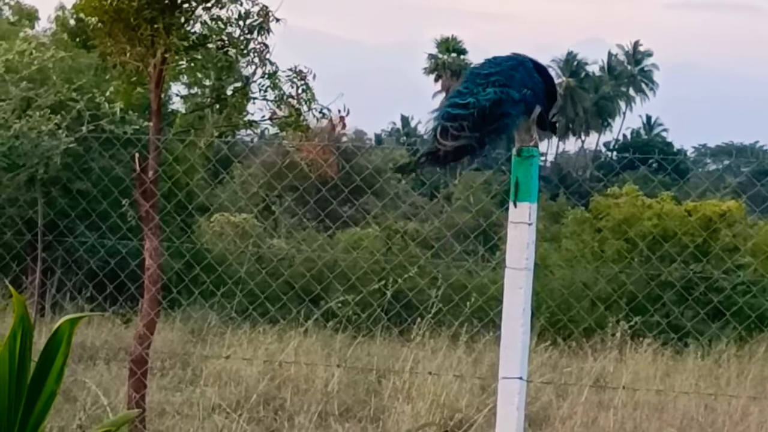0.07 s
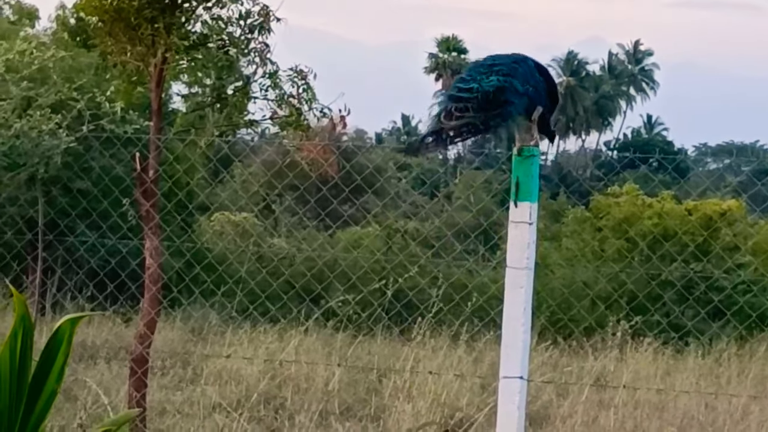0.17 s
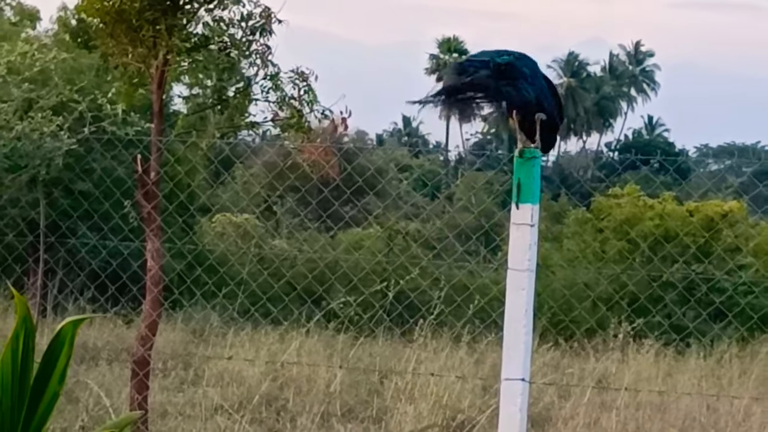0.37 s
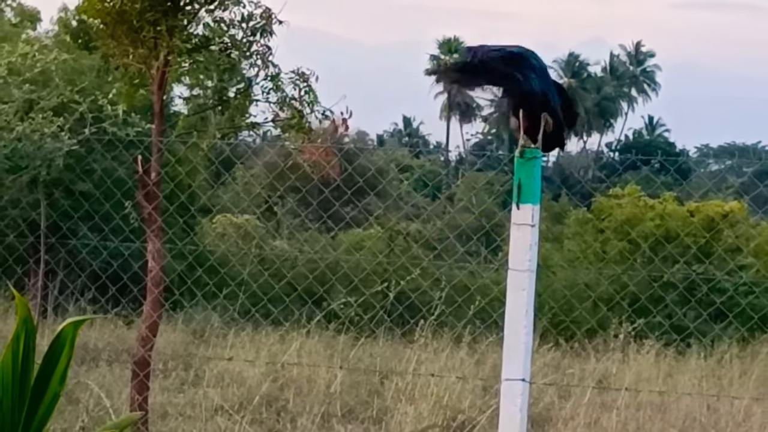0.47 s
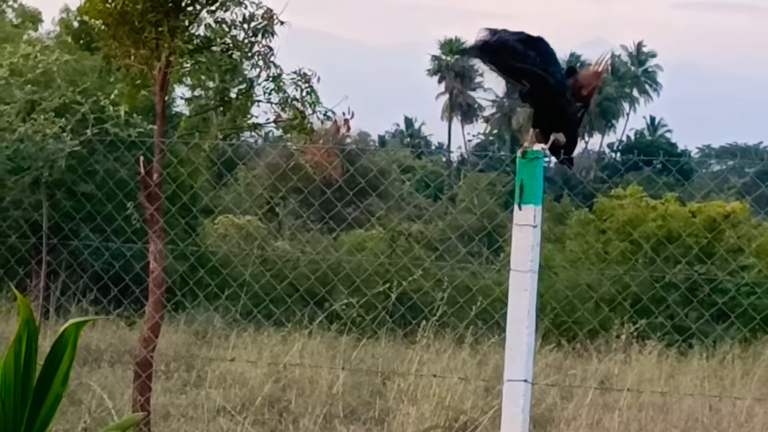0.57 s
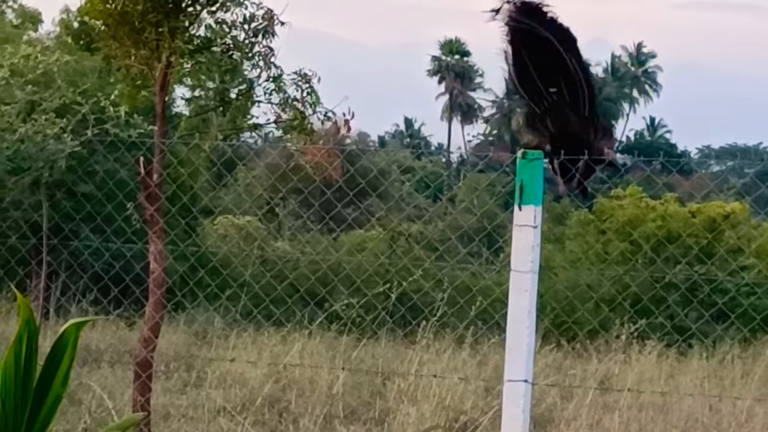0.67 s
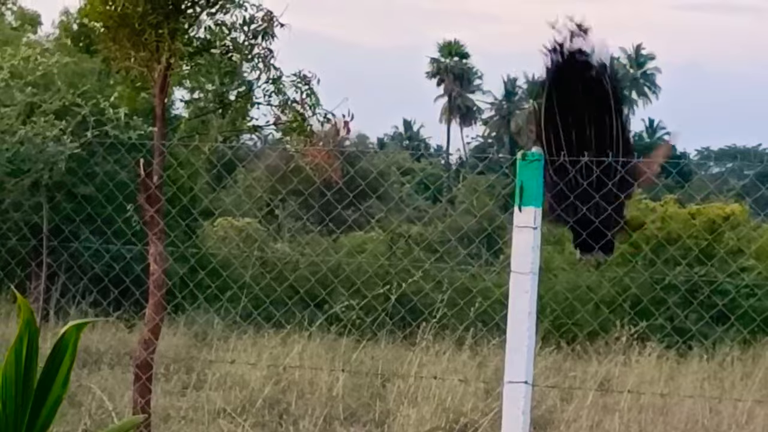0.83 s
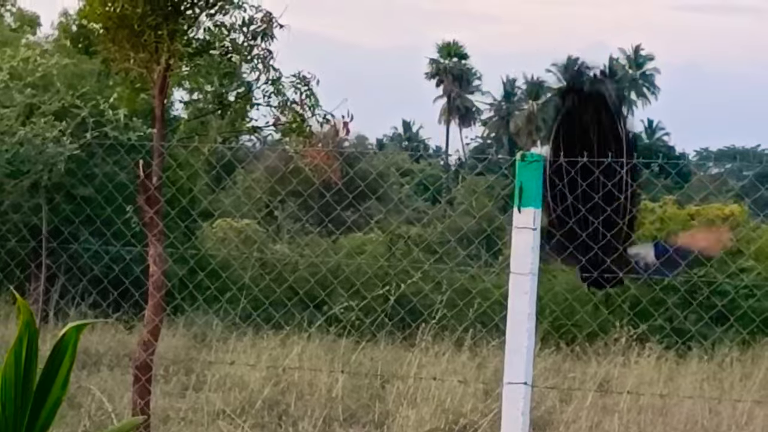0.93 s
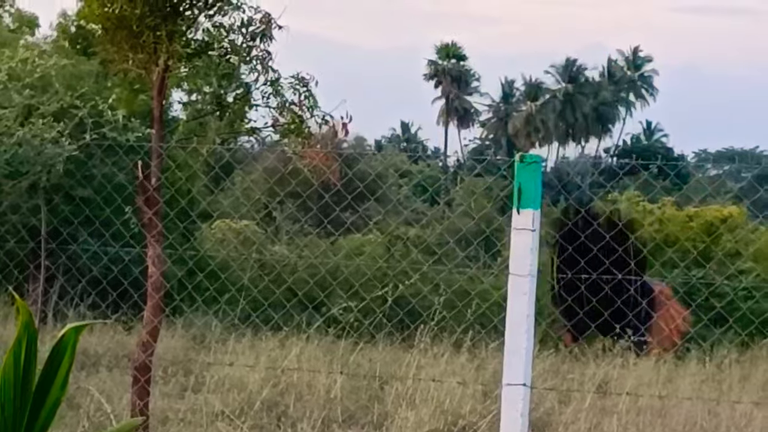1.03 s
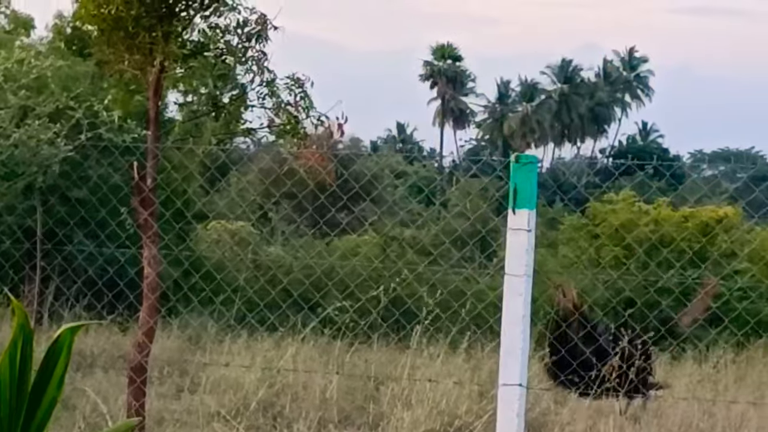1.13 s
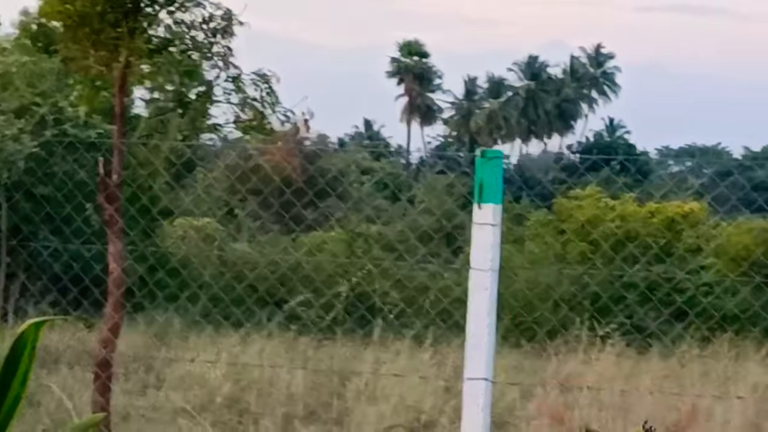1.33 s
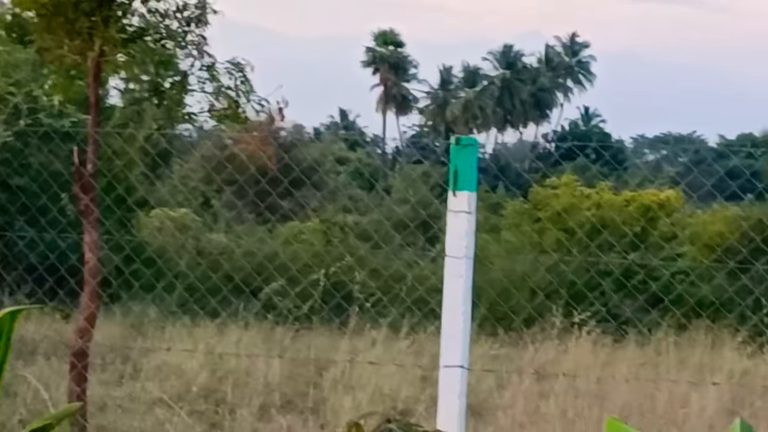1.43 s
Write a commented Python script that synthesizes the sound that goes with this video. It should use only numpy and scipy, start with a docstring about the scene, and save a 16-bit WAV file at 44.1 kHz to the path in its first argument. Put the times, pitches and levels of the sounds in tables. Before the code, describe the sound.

Insects trill in quick, high runs over a far cricket chorus at a field edge. Wind buffets the microphone's left side with a low rumble, then a peacock drops off a post, rustling softly. Small birds call faintly.

```python
"""A field edge at dusk: a far cricket chorus hisses while nearer insects rub their wings in slowing runs
of falling chirps. A gust buffets the left microphone port with a low rumble, the loudest sound here.
Something rustles softly (crackly noise and tiny snaps) as a peacock drops off a fence post.
Small birds call in the distance with short tones, and a thin insect ticks over the hush of open air."""
import sys
import numpy as np
from scipy import signal
from scipy.fft import rfft, irfft
from scipy.io import wavfile
from scipy.ndimage import uniform_filter1d

SR = 44100
rng = np.random.default_rng(int(sys.argv[2]) if len(sys.argv) > 2 else 0)


def generate_wav(sig):
    """Save sig (samples, or channels by samples) to the path in sys.argv[1] as 16-bit PCM at SR."""
    pcm = np.round(np.clip(np.atleast_2d(sig).T, -1, 1) * 32767).astype(np.int16)
    wavfile.write(sys.argv[1], SR, pcm)


N = 66150
TIME = np.arange(N) / SR
RUSTLE_PAN_DB = 12.5


def from_db(db):
    """Turn decibels into a gain to multiply by."""
    return 10 ** (np.asarray(db) / 20)


def rms_one(x):
    """Scale a signal so that its average power is 1."""
    return x / np.sqrt(np.mean(x ** 2) + 1e-20)


def pan(db):
    """Left and right gains: positive db is louder on the left, negative on the right."""
    return rms_one(np.array([[from_db(db)], [1.]]))


def in_time(rows):
    """Join (time, value) points with straight lines."""
    return np.interp(TIME, *np.transpose(rows))


def per_bin(points):
    """Join (pitch, value) points into a curve over all frequencies, with octaves evenly spaced."""
    hz, value = np.transpose(points)
    return np.interp(np.log(np.fft.rfftfreq(N, 1 / SR) + 1), np.log(hz), value)


def tint(x, colour):
    """Give a signal a tone colour, listed as (pitch_hz, level_db) points, and a power of 1."""
    return rms_one(irfft(rfft(x) * from_db(per_bin(colour)), N))


def noise(colour):
    """Steady noise with the given tone colour."""
    return tint(rng.standard_normal(N), colour)


def drift(rate_hz):
    """Smooth random wandering of about 1 either way, mostly slower than rate_hz."""
    smoothing = 1 + (np.fft.rfftfreq(N, 1 / SR) / rate_hz) ** 2
    return rms_one(irfft(rfft(rng.standard_normal(N)) / smoothing, N))


def even(x):
    """Level out the slow swells in a noise."""
    return x / np.sqrt(uniform_filter1d(x ** 2, size=1300) + 1e-9)


def chirp(middle_s, length_s, hz, glide_hz_per_s, waver_hz=0, octave_gain=0):
    """A gliding tone that swells and fades around middle_s."""
    out = np.zeros(N)
    live = np.abs(TIME - middle_s) < length_s / 2
    t = TIME[live] - middle_s
    pitch_hz = hz + glide_hz_per_s * t + (waver_hz[live] if np.ndim(waver_hz) else 0)
    phase = 2 * np.pi * (np.cumsum(pitch_hz) / SR + rng.random())
    swell = np.cos(np.pi * t / length_s) ** 2
    out[live] = swell * (np.sin(phase) + octave_gain * np.sin(2 * phase))
    return out


def air():
    """The steady hush of open country."""
    # tone colour of the hush: pitch_hz, level_db
    colour = [(20, -17), (70, 7.5), (130, 0.5), (220, -6.5), (400, -15), (650, -7.5), (1080, -6),
              (1450, -17), (2050, -15), (2600, -31), (4400, -35.5), (8500, -46), (9800, -64), (13500, -38),
              (15500, -43)]
    # how alike left and right are: pitch_hz, likeness (1 the same, -1 opposite)
    likeness = [(60, 0.81), (290, 0.12), (640, 0.048), (1100, -0.82), (1500, -0.65), (3100, 0.013),
                (15000, 0)]
    alike = np.clip(per_bin(likeness), -.98, .98)
    same = irfft(rfft(noise(colour)) * np.sqrt((1 + alike) / 2), N)
    opposite = irfft(rfft(noise(colour)) * np.sqrt((1 - alike) / 2), N)
    return from_db(-55) * np.array([same + opposite, same - opposite])


def cricket_chorus():
    """Countless far crickets merge into a hiss, with a few pulsing through it."""
    # tone colour of the hiss: pitch_hz, level_db
    colour = [(4000, -26), (4650, -25.5), (5250, -9), (5700, -15.5), (6250, -7), (6650, -7), (7200, 1.5),
              (7600, 1.5), (8000, -4), (8550, -11), (8950, -24), (9400, -47.5)]
    # crickets that stand out: pitch_hz, chirps_per_s, level_db, pan_db
    crickets = [(7600, 14, -62, 14), (7300, 24, -71.5, -1), (7950, 29, -62.5, 23), (5650, 210, -82.5, -7)]
    hiss = [noise(colour) * from_db(-59.5 + .5 * drift(rate_hz=45)) for _ in range(2)]
    out = pan(db=1) * np.array(hiss)
    for hz, rate, db, pan_db in crickets:
        for beat_s in (np.arange(int(rate * N / SR) + 1) + rng.random()) / rate:
            level = from_db(db + rng.normal(0, 1.1))
            s = beat_s + rng.normal(0, .0015)
            note = chirp(s, length_s=.03, hz=hz + rng.normal(0, 28), glide_hz_per_s=-28000)
            out += pan(pan_db) * level * note
    return out


def birds():
    """Faint gliding notes and duller calls from farther off; a fast pitch wobble makes them raspy."""
    # gliding notes: middle_s, length_s, pitch_hz, glide_hz_per_s, level_db, pan_db, rasp_hz
    notes = [(0.169, 0.071, 2396, -4000, -64.5, 20, 256), (0.388, 0.06, 3580, -500, -74, -13, 35),
             (0.892, .07, 3880, -4000, -70.5, -12, 130), (1.476, 0.045, 2335, 22000, -61, -14, 40.3),
             (1.477, 0.073, 3990, 14000, -64.5, 7, 430), (1.497, .026, 3350, -5000, -65, -22, 50)]
    # dull calls: middle_s, length_s, pitch_hz, level_db, pan_db
    far_calls = [(.522, 0.025, 1106, -59.5, -5), (0.643, 0.031, 1104, -57.5, -1),
                 (1.3, .07, 1080, -59.5, -6), (1.369, .04, 1002, -61.5, -12), (1.409, 0.032, 737, -54, -5)]
    out = np.zeros((2, N))
    for s, length, hz, glide, db, pan_db, rasp_hz in notes:
        out += pan(pan_db) * from_db(db) * chirp(s, length, hz, glide, rasp_hz * drift(rate_hz=530))
    for s, length, hz, db, pan_db in far_calls:
        out += pan(pan_db) * from_db(db) * chirp(s, length, hz, 0, waver_hz=45 * drift(rate_hz=250))
    return out


def insect_ticks():
    """Short falling notes of a high-pitched insect on the right."""
    # thin ticks: middle_s, level_db
    ticks = [(.03, -70), (.196, -71), (.245, -68), (.297, -68), (.455, -69), (.503, -70), (.558, -70.5),
             (.725, -75), (.774, -73.5), (.826, -72), (0.849, -71), (.97, -73), (1.035, -69), (1.087, -70),
             (1.24, -71), (1.292, -69), (1.343, -67), (1.392, -69.5), (1.493, -73)]
    waver_hz = 60 * drift(rate_hz=170)
    out = np.zeros(N)
    for s, db in ticks:
        out += from_db(db) * chirp(s, length_s=.028, hz=8950, glide_hz_per_s=-14000, waver_hz=waver_hz)
    return pan(db=-11) * out


def rustle():
    """Soft brushing with a fine crackle in it, mostly on the left."""
    # loudness of the rustle: time_s, level_db
    loudness = [(0, -88.5), (.5, -77.5), (.56, -70), (.59, -69), (.614, -68.5), (.65, -62), (.714, -63.5),
                (.735, -73), (.792, -69.5), (.82, -62), (.866, -74), (.9, -64.5), (.92, -67), (1.02, -70),
                (1.068, -57), (1.09, -72), (1.118, -78), (1.145, -67), (1.204, -74), (1.282, -60),
                (1.312, -72), (1.408, -70), (1.5, -70.5)]
    # its tone colour: pitch_hz, level_db
    colour = [(500, -23.5), (1100, 18.5), (1500, 6.5), (2000, 13.5), (2800, -4.5), (3600, 4.5), (4400, 9),
              (5500, 1.5), (9000, -3), (12000, -3), (15500, -7.5)]
    clicks_per_s = 900
    level = from_db(in_time(loudness) + .5 * drift(rate_hz=900))
    clicks = (rng.random(N) < clicks_per_s / SR) * rng.standard_normal(N)
    crackle = from_db(-3) * tint(clicks, colour)
    brushing = np.array([noise(colour), noise(colour)])
    return pan(RUSTLE_PAN_DB) * level * rms_one(brushing + crackle)


def snaps():
    """Tiny dry cracks in the rustle: bursts of noise that rise fast and die away."""
    # cracks: peak_s, level_db, pitch_hz, width_octaves, decay_s
    cracks = [(.59, -69, 8900, 0.88, 0.0059), (0.897, -62.5, 10000, .5, 0.0034),
              (0.984, -65, 11100, 0.64, .002), (1.072, -52, 4220, 0.11, 0.0059),
              (1.277, -62, 4360, 0.12, 0.0034)]
    rise_s = .0011
    out = np.zeros(N)
    for s, db, hz, octaves, decay_s in cracks:
        colour = [(hz / 16 ** octaves, -48), (hz, 0), (hz * 16 ** octaves, -48)]
        rise = np.clip((TIME - s) / rise_s + 1, 0, 1)
        fall = np.exp(-np.maximum(TIME - s, 0) / decay_s)
        out += from_db(db) * noise(colour) * rise * fall
    return pan(RUSTLE_PAN_DB) * out


def insect_trills():
    """Each run of wing strokes slows toward its end; the ground echoes its chirps, duller."""
    # runs: last_chirp_s, chirp_count, pitch_hz, level_db, fade_in_db_per_chirp, pan_db, echo_db
    runs = [(.101, 6, 5057, -55.5, 0, -17, -1), (.21, 12, 5275, -52, 0.8, 25, -4),
            (0.371, 4, 5450, -69, 0, 10, -13), (.758, 13, 5060, -55, 2.5, -18.5, -9.5),
            (1.392, 12, 5046, -55.5, 2, -16, -11)]
    # single chirps of the same insects: middle_s, length_s, pitch_hz, level_db
    lone_chirps = [(.282, 0.024, 5080, -68), (0.298, 0.024, 4840, -68.5), (0.771, .018, 4600, -67),
                   (1.098, .018, 5200, -61), (1.463, 0.019, 5100, -68)]
    chirp_s, echo_delay_s, glide_hz_per_s = .017, .0076, -37000
    last_gap_s, gap_step_s, shortest_gap_s = .0305, .0023, .017
    waver_hz = 50 * drift(rate_hz=170)
    out = np.zeros((2, N))
    for s, count, hz, db, fade_db, pan_db, echo_db in runs:
        octave_gain = from_db(-22 + min(pan_db, 0))
        for k in range(count):  # work backward from the last chirp
            fade_steps = max(0, k - 7)  # the last eight chirps are at full strength
            level = from_db(db - fade_db * fade_steps + rng.normal(0, 1))
            direct = chirp(s, chirp_s, hz, glide_hz_per_s, waver_hz, octave_gain)
            echo = from_db(echo_db) * chirp(s + echo_delay_s, chirp_s, hz, glide_hz_per_s, waver_hz)
            out += pan(pan_db) * level * (direct + echo)
            s -= max(shortest_gap_s, last_gap_s - gap_step_s * k)
    for s, length, hz, db in lone_chirps:
        out += pan(db=-19) * from_db(db) * chirp(s, length, hz, glide_hz_per_s, waver_hz)
    return out


def wind():
    """A gust hits the left port with a slow push, fast swirls and thumps; the right port is sheltered."""
    # rise and fall of the push: time_s, level_db
    gust = [(0, -87), (.07, -64), (.12, -49.5), (.18, -57.5), (.208, -35.5), (.254, -23), (.285, -37),
            (.308, -14), (.358, -29.5), (.39, -20.5), (.53, -20), (.565, -36), (.605, -24), (.75, -28.5),
            (.79, -24.5), (.91, -28.5), (.945, -28), (1.025, -25), (1.14, -34), (1.18, -51.5), (1.225, -32),
            (1.26, -55.5), (1.5, -95)]
    # tone colour of the push: pitch_hz, level_db
    push_colour = [(15, -13.5), (30, -18.5), (50, -5.5), (115, 2), (160, -3), (220, -15.5), (320, -52.5),
                   (600, -56), (1500, -94)]
    # rise and fall of the swirls: time_s, level_db
    swirl_level = [(0, -82), (.19, -83.5), (.255, -29.5), (.285, -37), (.325, -21), (.36, -28),
                   (.405, -17.5), (.44, -29.5), (.49, -29.5), (.56, -41.5), (.595, -35.5), (.63, -46.5),
                   (.68, -26.5), (.72, -48.5), (.77, -55.5), (.82, -29.5), (.88, -47), (.94, -48.5),
                   (.975, -39), (1.04, -37), (1.13, -63), (1.19, -94), (1.5, -76)]
    # tone colour of the swirls: pitch_hz, level_db
    swirl_colour = [(60, -34), (150, 2), (230, 3), (330, -3.5), (450, -19), (600, -29.5), (900, -42),
                    (2000, -82)]
    # thumps, each one down-and-up swing of air pressure: middle_s, peak_db, pitch_hz
    thumps = [(.303, -15.5, 70.3), (.322, -7, 140), (0.332, -10.5, 185), (.386, -9, 203),
              (0.395, -9.5, 75.3), (.405, -16, 223), (.461, -14.5, 173), (0.491, -19.5, 253),
              (.541, -9.5, 98), (0.596, -13.5, 157.4), (0.616, -26, 70.5), (0.788, -20, 89),
              (0.807, -22, 222), (.903, -14.5, 195), (1.026, -15.5, 132), (1.233, -43.5, 157)]
    push = from_db(in_time(gust) + 2.5) * even(noise(push_colour))
    swirls = from_db(in_time(swirl_level)) * even(noise(swirl_colour))
    left = push + swirls
    for s, db, hz in thumps:
        phase = 2 * np.pi * hz * (TIME - s)
        bell_curve = np.exp((1 - np.minimum(phase ** 2, 100)) / 2)
        left += from_db(db) * phase * bell_curve
    right = from_db(in_time(gust) - 35.5) * noise(push_colour)
    return np.array([left, right])


def scene():
    """All the sounds of the field added together, left and right."""
    return air() + wind() + rustle() + snaps() + birds() + insect_ticks() + insect_trills() + cricket_chorus()


def record(dry):
    """Cut the very highest treble steeply."""
    cutoff_hz = 15700
    return signal.sosfilt(signal.ellip(10, .1, 80, cutoff_hz, fs=SR, output="sos"), dry)


dry = scene()
out = record(dry)
generate_wav(out)
```